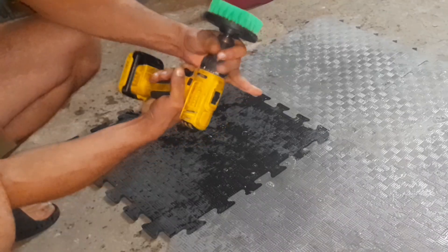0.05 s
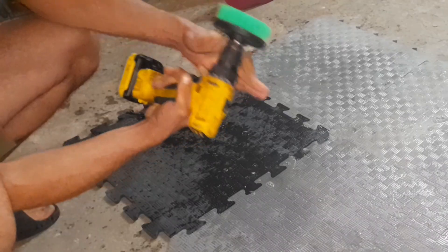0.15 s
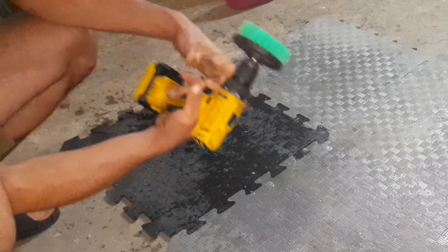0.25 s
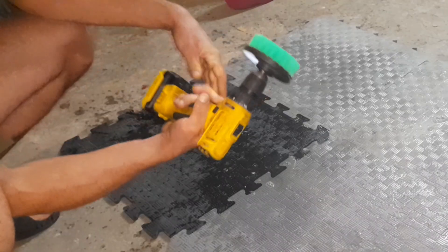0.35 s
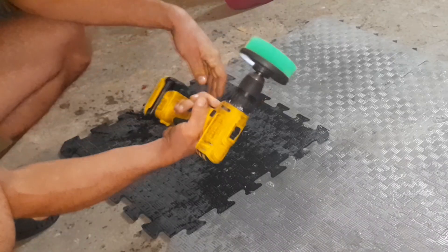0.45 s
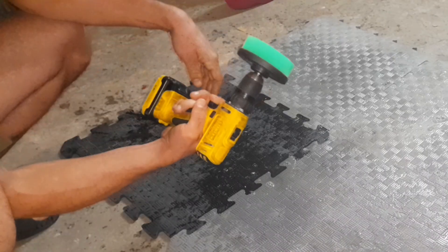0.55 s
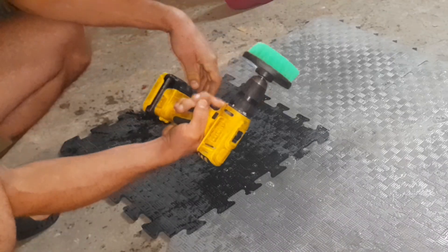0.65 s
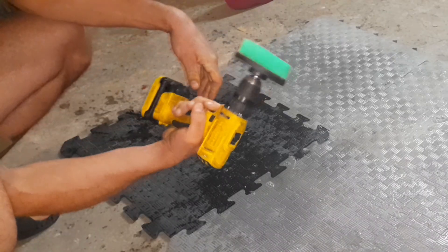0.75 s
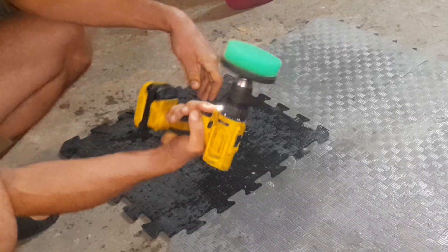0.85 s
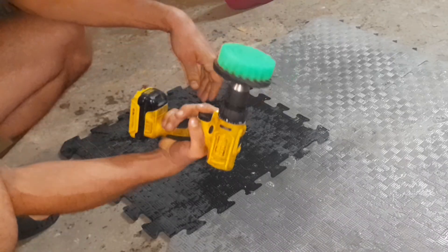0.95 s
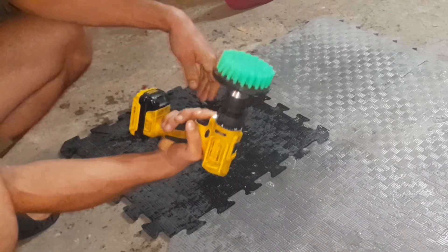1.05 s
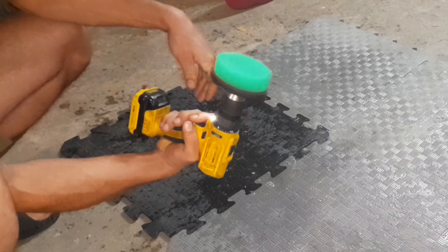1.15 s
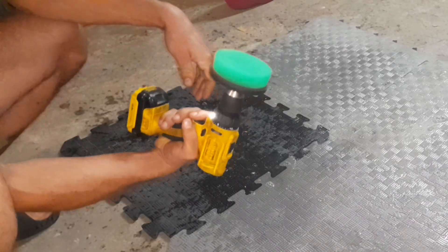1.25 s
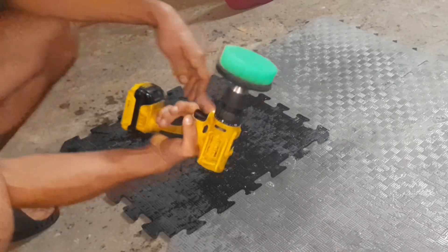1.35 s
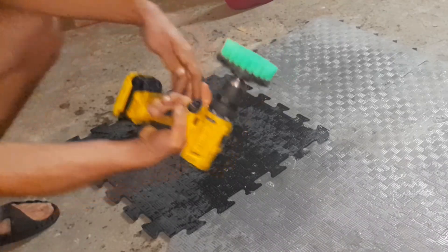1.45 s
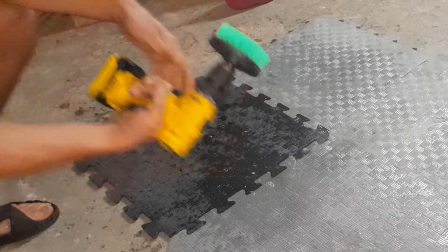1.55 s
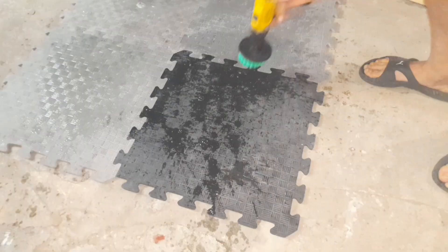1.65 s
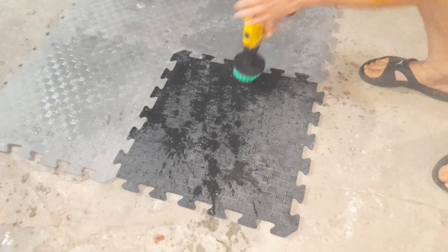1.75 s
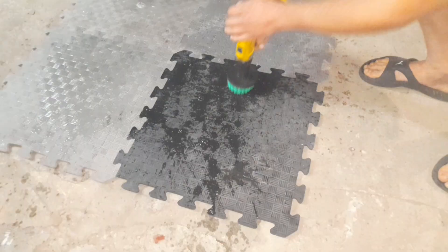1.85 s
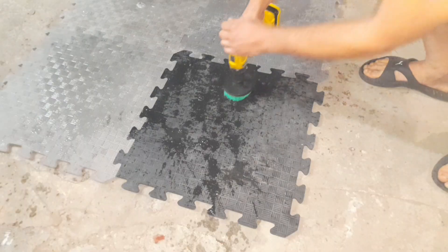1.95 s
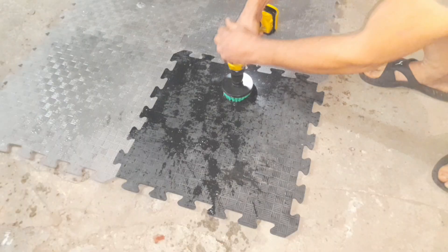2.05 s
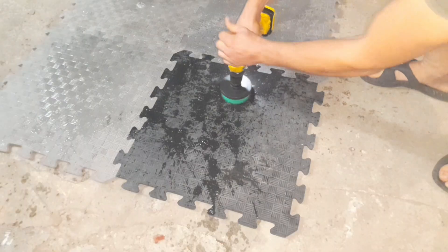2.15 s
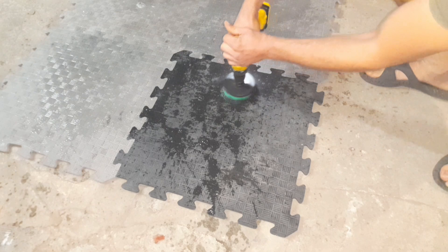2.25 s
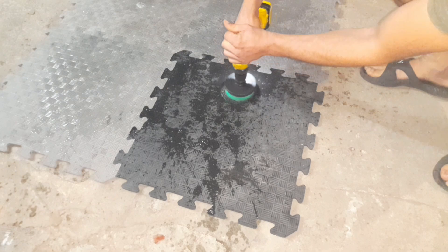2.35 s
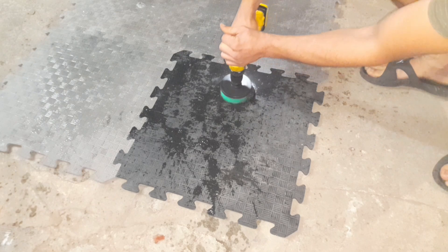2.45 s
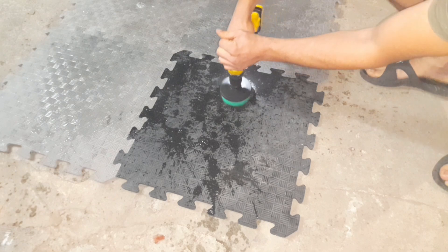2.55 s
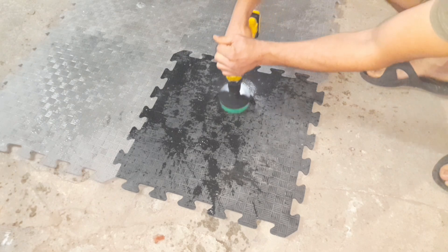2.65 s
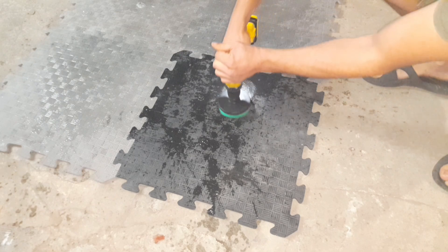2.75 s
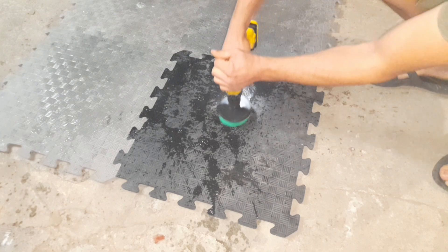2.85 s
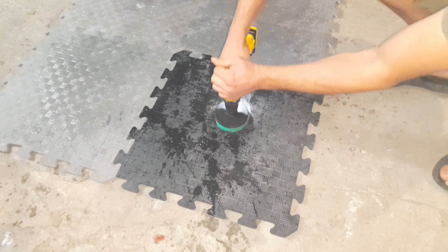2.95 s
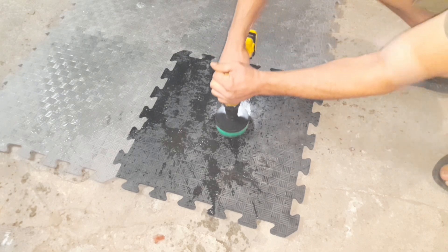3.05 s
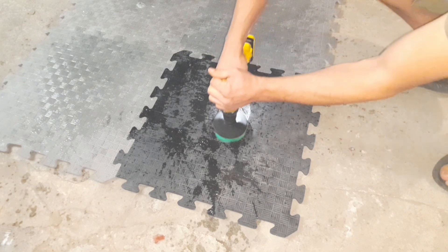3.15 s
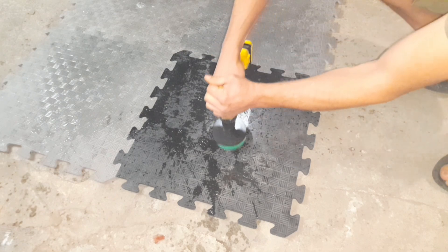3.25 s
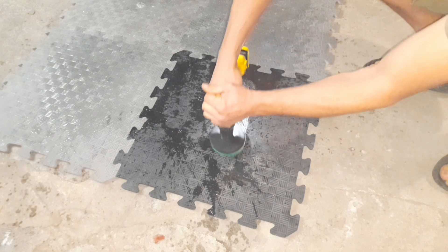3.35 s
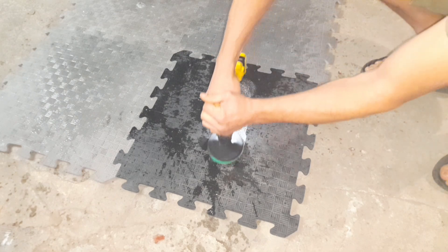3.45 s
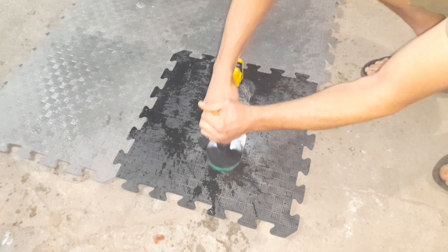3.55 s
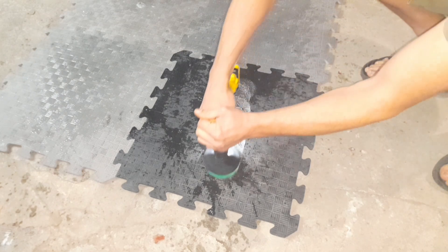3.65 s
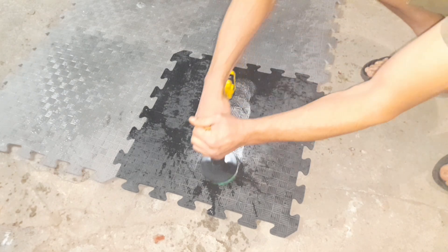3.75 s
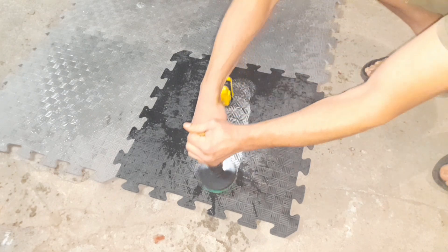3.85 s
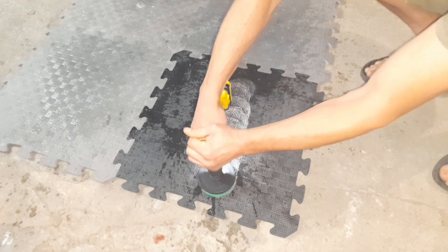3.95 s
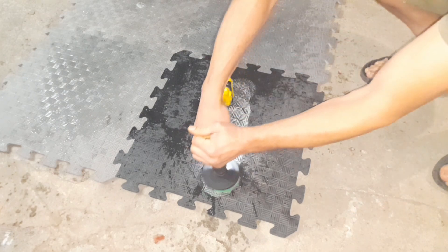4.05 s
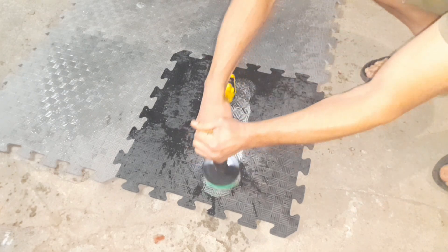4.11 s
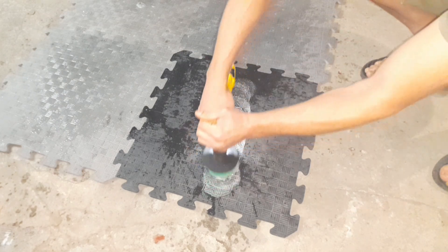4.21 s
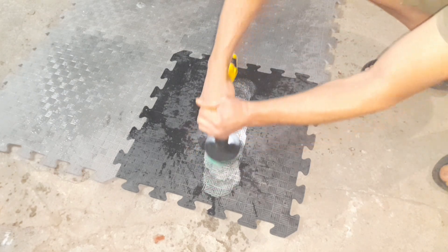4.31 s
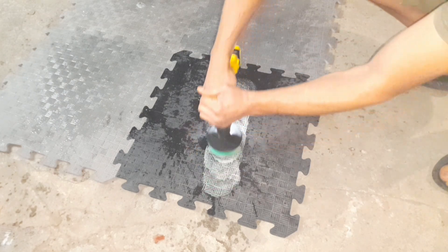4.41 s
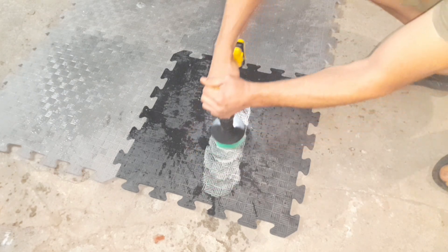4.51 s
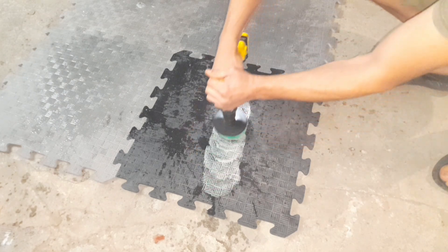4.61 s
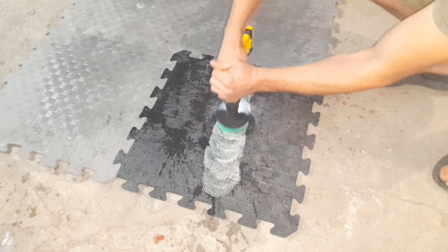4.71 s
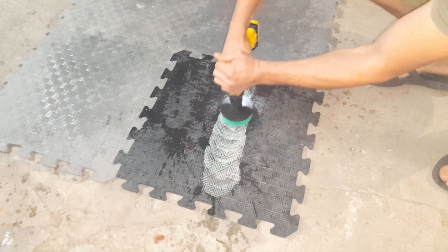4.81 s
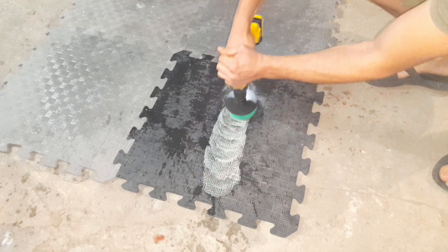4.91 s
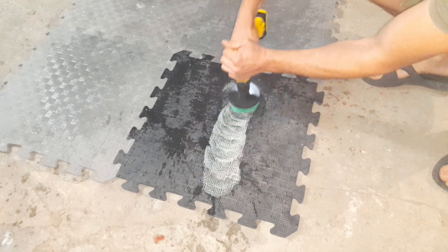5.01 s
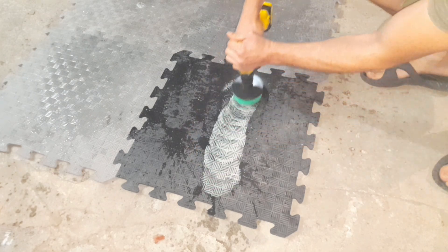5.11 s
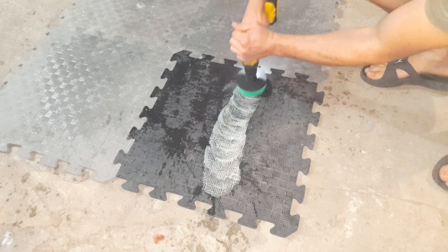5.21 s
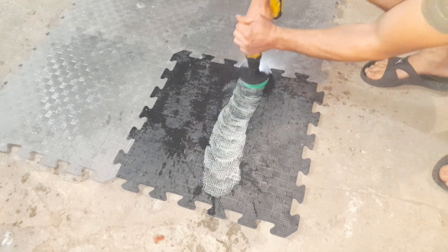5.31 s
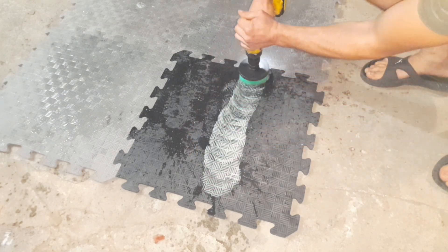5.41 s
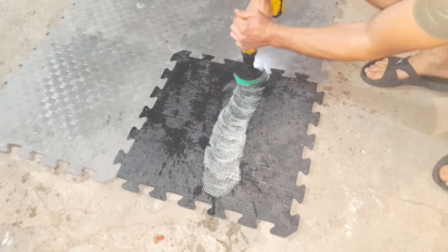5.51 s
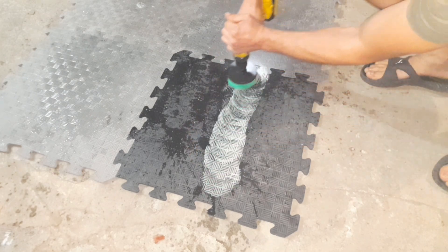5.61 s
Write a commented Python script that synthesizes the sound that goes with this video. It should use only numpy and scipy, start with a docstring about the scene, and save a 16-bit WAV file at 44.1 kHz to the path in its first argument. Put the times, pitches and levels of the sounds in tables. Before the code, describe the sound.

Three quick, grainy drill bursts with plastic and metallic clicks sound very near, while a machine hums and blows air nearby. After the air and hum cut out, only low distant rumble remains briefly. A brush touches wet rubber and starts a steady rough scrubbing, its hollow ring shifting and the loaded motor whining up and down to the end.

```python
"""Three short drill blips in the air, close to the microphone, over the hum of a fan-like machine nearby.
The hum ends abruptly; the round scrub brush settles on a wet, soapy rubber mat and is driven forward and back.
Random grains make the bristles, spray and gear rattle; sine tones that waver with speed make the motor.
Struck resonances make the clacks; filtered noise makes the machine's air and the distant outdoor rumble."""
import sys
import numpy as np
from scipy import signal
from scipy.fft import rfft, irfft
from scipy.io import wavfile

SR = 44100
rng = np.random.default_rng(int(sys.argv[2]) if len(sys.argv) > 2 else 0)


def persist_wave(psi):
    """Save psi, clipped to +-1, as 16-bit WAV."""
    counts = np.round(np.clip(psi, -1, 1) * 32767).astype(np.int16)
    wavfile.write(sys.argv[1], SR, np.atleast_2d(counts).T)


N = 250047
TIME = np.arange(N) / SR
BIN_HZ = np.maximum(np.arange(N // 2 + 1) * SR / N, 1)

# Trigger blips in the air. Each row: pressed in seconds, released in seconds, pitch the motor heads for in Hz,
# spin-up time constant in seconds, gear rattle in dB at full speed.
TRIGGER_BLIPS = [(.37, .553, 1000, .15, -38.2), (.696, .9, 860, .09, -38.3),
                 (1.108, 1.315, 860, .098, -38.9)]
# Motor and gear tones in the air. Each row: multiple of the motor pitch, level in dB at full speed.
FREE_ORDERS = [(1, -48), (2, -51), (3, -46.5), (6, -48), (14, -62)]
# Spectra of the free drill: gear rattle, air and bearing noise, low shaking.
# Each row: frequency in Hz, relative density in dB.
GEARBOX_SPECTRUM = [(250, -22.5), (500, -1), (900, -2), (1900, 3), (2600, -1.5), (3900, 2.5), (4350, 1.5),
                    (4900, 0.5), (6000, 2), (7500, -11.5), (16000, -30)]
WHIRR_SPECTRUM = [(1500, -22), (4400, 5.5), (8400, 0.5), (16000, -8.5)]
SHAKE_SPECTRUM = [(25, -30), (45, -6), (62, 7), (100, 0.5), (170, -14.5), (300, -12), (600, -41.5)]
KICK_HZ, SWITCH_S = 379, .012   # the motor starts from this pitch; time of a switching ramp
COAST_S = .066   # time constant of the run-down
FULL_SPEED_HZ, STALL_HZ = 804, 60   # reference pitch; below the second the gears fall silent
RATTLE_GROWTH = 0.38   # power of the speed
BRAKE_RATTLE_DB, BRAKE_S = 3.5, 0.047   # slack gears rattle harder just after release
EASE_S, EASE_DB = .042, -4.5   # the finger eases off just before release and unloads the gears

# Brush scrubbing the mat. Each row: time in seconds, relative bristle level in dB, relative spray level in dB.
SCRUB_EFFORT = [(2.17, -26, -41), (2.32, -24.5, -36), (2.52, -26.5, -41), (2.72, -24.5, -37),
                (2.85, -27, -39), (3.2, -26, -38), (3.83, -27.5, -40), (4.6, -26.5, -39), (5.64, -27, -37),
                (5.67, -27.5, -36)]
# Motor under load. Each row: time in seconds, motor pitch in Hz, level in dB.
LOADED_MOTOR = [(2.1, 300, -66), (2.3, 328, -56), (2.55, 320, -58), (2.8, 372, -56), (3.0, 390, -53),
                (3.22, 388, -54), (3.5, 376, -66), (3.88, 318, -55), (4.15, 281, -61), (4.5, 333, -61),
                (4.65, 316, -58), (4.83, 340, -64), (5.13, 315, -56.5), (5.4, 345, -62), (5.67, 393, -58)]
# Motor tones under load. Each row: multiple of the motor pitch, level in dB relative to the motor.
LOADED_ORDERS = [(1, 1), (1.09, -7), (2, -9), (3, -2), (4, -10)]
# Hollow under the brush. Each row: time in seconds, relative level in dB, centre in Hz.
HOLLOW_RING = [(2.17, -34, 1210), (2.4, -36, 1300), (2.53, -34, 1110), (2.82, -29, 1230), (3.06, -31, 1190),
               (3.15, -30.5, 1050), (3.29, -29, 1250), (3.4, -26.5, 1220), (3.52, -30, 1430),
               (3.75, -35, 1260), (4.26, -36, 1110), (4.51, -26.5, 1220), (4.66, -30.5, 1100),
               (5.07, -37, 1290), (5.18, -36, 1460), (5.67, -37, 1090)]
# Spectra at the mat: driven bristles, flung soap, still bristles settling, tufts snapping free.
# Each row: frequency in Hz, relative density in dB.
BRISTLE_SPECTRUM = [(150, -57), (280, -21.5), (520, -21.5), (880, -9.5), (1600, -8), (2800, -0.5),
                    (4400, -5.5), (5800, -4.5), (8400, -16.5), (12000, -31)]
SPRAY_SPECTRUM = [(6000, -28), (9500, -4.5), (13000, -1.5), (14700, 1), (16000, -11)]
TOUCH_SPECTRUM = [(300, -22), (700, -12.5), (1200, 0.5), (1900, -3.5), (2600, -4.5), (4400, -4),
                  (8000, -17), (16000, -21)]
TUFT_SPECTRUM = [(400, -23), (650, 0), (900, 7.5), (2000, -0.5), (3000, -20)]
# Brush disc and the drill behind it. Each row: resonance in Hz, width in Hz, lift in dB.
DISC_RESONANCES = [(624, 12, 6), (896, 25, 2.5), (1820, 54, 2.5), (2400, 80, 1), (2730, 44, 2.5),
                   (3040, 58, 1)]
SCRUB_START_S, SCRUB_ATTACK_S, SCRUB_RISE_DB = 2.083, 0.075, 25.5   # the brush spins up on the mat
BRISTLE_DB, SPRAY_DB, HOLLOW_DB = -0.5, 0.5, -0.2   # added to the levels in the tables
SPRAY_ONSET_S = 0.095   # the soap spray comes up over this time
SETTLE_S, SETTLE_ATTACK_S, SETTLE_HOLD_S = 1.956, .018, .052   # hold counts from the start
SETTLE_DB, SETTLE_FADE_DB_PER_S = -45.5, 240

# Chuck and spindle lock clacking, brush knocking down.
# Each row: time in seconds, relative strength in dB, brightness in dB per octave.
CLACKS = [(0.359, -21, 0.5), (0.548, -26.5, -9), (0.564, -14.8, -1), (0.58, -25, -7), (0.588, -24, -5.5),
          (0.684, -30, -1), (0.895, -29, 0), (0.911, -23.5, -2), (1.312, -26, 1), (1.33, -25, 0),
          (2.073, -40, -8), (2.102, -33, -3)]
# Drill housing modes. Each row: frequency in Hz, relative strength in dB, 60 dB decay in seconds.
HOUSING_MODES = [(1350, -19, .02), (1900, -18, .02), (2600, -16, .015), (3300, -15, .012), (4200, -15, .01),
                 (5400, -9, .012), (6300, -10, .01), (8000, -15, .008), (11300, -16, .008),
                 (13500, -16, .006)]

# Wavering tones of the nearby machine. Each row: frequency in Hz, rate of wandering in Hz, level in dB.
MACHINE_TONES = [(90.5, 5.8, -49), (965, 5.99, -54), (890, 30, -64), (1965, 31, -59)]
# Rushing air of the nearby machine. Each row: frequency in Hz, relative density in dB.
MACHINE_SPECTRUM = [(25, -32), (55, -4.5), (95, -6.5), (175, -16.5), (290, -19.5), (600, -24.5), (900, -16),
                    (1150, -29.5), (1550, -20), (2400, -22.5), (4500, -19), (6200, -23.5), (8000, -36),
                    (16000, -41)]
# The machine's air arrives from all sides. Each row: frequency in Hz, left-right likeness from 0 to 1.
DIFFUSE_LIKENESS = [(290, .9), (640, 0)]
MACHINE_DB, HUM_HZ, HUM_DB, HUM_ENDS_S = -41, 285, -50.9971, 1.612
TAIL_DB, TAIL_FADE_DB_PER_S = -8, 100   # the rush drops and fades out quickly where the hum ends

# Distant outdoor rumble. Each row: frequency in Hz, relative density in dB.
YARD_SPECTRUM = [(25, -26.5), (55, 3.5), (75, -5), (130, -5.5), (210, -15), (700, -28.5), (2800, -44),
                 (16000, -47.5)]
YARD_DB = -50

# Microphone pair on close sounds. Each row: frequency in Hz, left-right likeness from 0 to 1.
PAIR_LIKENESS = [(60, .98), (240, .92), (500, .82), (1000, .68), (2000, .5), (4000, .08), (8000, 0)]
# Balance of the pair. Each row: frequency in Hz, left minus right in dB.
PAIR_BALANCE = [(2700, -2.5), (4400, -1), (6400, -5.5), (8200, 12.5), (9800, -0.5), (12500, -7),
                (15000, -4.5)]
# Response common to the pair. Each row: frequency in Hz, gain in dB.
PAIR_RESPONSE = [(8400, 0), (9800, -4.5), (12200, 1)]
CUTOFF_HZ = 15900


def trigger():
    """Each blip kicks the motor, spins it up and lets it run down; gives pitch and rattle strength."""
    pitches, rattles = [], []
    for pressed, released, top_hz, spin_up_s, db in TRIGGER_BLIPS:
        driven_s = np.minimum(since(pressed), released - pressed)
        hz = top_hz - (top_hz - KICK_HZ) * np.exp(-driven_s / spin_up_s)
        hz = hz * ramp(pressed, SWITCH_S) * np.exp(-since(released) / COAST_S)
        braking = ramp(released, SWITCH_S) * np.exp(-since(released) / BRAKE_S)
        easing = ramp(released - EASE_S, SWITCH_S) - ramp(released, SWITCH_S)
        rattle_db = db + EASE_DB * easing + BRAKE_RATTLE_DB * braking
        pitches.append(hz)
        rattles.append(from_db(rattle_db) * (hz / FULL_SPEED_HZ) ** RATTLE_GROWTH)
    pitch_hz = np.max(pitches, axis=0)
    turning = np.clip(pitch_hz / STALL_HZ - 1, 0, 1)
    return pitch_hz, turning * np.max(rattles, axis=0)


def free_drill():
    """Gear rattle swells once a turn; whirr and whine grow steeply with speed; the brush shakes the air."""
    pitch_hz, rattling = trigger()
    speed = pitch_hz / FULL_SPEED_HZ
    mesh = 1 + 0.43 * np.cos(2 * np.pi * np.cumsum(pitch_hz) / SR)
    rattle = rattling * colour(grains(16000, spread_db=1.8) * mesh, GEARBOX_SPECTRUM)
    whirr = from_db(-40) * speed ** 1.3 * colour(hiss() * mesh, WHIRR_SPECTRUM)
    tones = speed ** 2 * whine(pitch_hz, FREE_ORDERS, jitter=.013, flutter_db=2.5)
    shake = from_db(-43.0) * speed * colour(hiss(), SHAKE_SPECTRUM)
    return rattle + whirr + tones + shake


def scrubbing():
    """Bristles stick and flick, the hollow under the brush rings, and soap is flung off as fine spray."""
    bristle_db, spray_db = in_time(SCRUB_EFFORT)
    motor_hz, motor_db = in_time(LOADED_MOTOR)
    hollow_db, hollow_hz = in_time(HOLLOW_RING)
    rise_db = SCRUB_RISE_DB * (ramp(SCRUB_START_S, SCRUB_ATTACK_S) - 1)
    attack = ramp(SCRUB_START_S, SWITCH_S) * from_db(rise_db)
    # the tilted brush, geared down 18 to 1, presses harder once a turn, and its tufts catch unevenly
    turn = 2 * np.pi * np.cumsum(motor_hz / 18) / SR
    press = from_db(0.11 * np.sin(turn) + 0.63 * drift(90))
    flicks = colour(grains(motor_hz * 45, spread_db=2.0), BRISTLE_SPECTRUM)
    bristles = from_db(bristle_db + BRISTLE_DB) * flicks
    # whole tufts snapping free ring the hollow at two pitches
    tufts = colour(grains(motor_hz * 12, spread_db=2.0), TUFT_SPECTRUM)
    low_ring = resonate(tufts, hollow_hz, width_hz=400)
    high_ring = resonate(tufts, 1.65 * hollow_hz, width_hz=430)
    hollow = from_db(hollow_db + HOLLOW_DB) * (low_ring - from_db(-8) * high_ring)
    rub = bounce(through_disc(bristles + hollow), lag_s=.0055, sway=0.0596, gain_db=-13.5)
    droplets = colour(grains(16000, spread_db=1.5), SPRAY_SPECTRUM)
    spray = ramp(SCRUB_START_S, SPRAY_ONSET_S) * from_db(spray_db + SPRAY_DB) * droplets
    motor = from_db(motor_db) * whine(motor_hz, LOADED_ORDERS, jitter=.014, flutter_db=2.5)
    rumble = from_db(-54.5) * colour(hiss(), SHAKE_SPECTRUM)
    low_tone = from_db(-64.5) * wavering(167, rate_hz=9)
    return attack * (press * (rub + spray) + motor + rumble + low_tone)


def through_disc(x):
    """The disc's resonances lift narrow bands."""
    lift_db = sum(db / (1 + (2 * (BIN_HZ - hz) / width) ** 2) for hz, width, db in DISC_RESONANCES)
    return irfft(rfft(x) * from_db(lift_db), N)


def bounce(x, lag_s, sway, gain_db):
    """A near reflection whose path changes as the arms move."""
    late = TIME - lag_s * (1 + sway * drift(.8))
    return x + from_db(gain_db) * np.array([np.interp(late, TIME, side) for side in x])


def clacks():
    """Each knock is a sharp snap that rings the housing's modes with strengths of its own."""
    at, strength_db, bright_db = np.transpose(CLACKS)
    chance_db = rng.normal(0, 1.5, (len(at), len(HOUSING_MODES)))
    starts = (at * SR).astype(int)
    rings = np.zeros(N)
    for k, (hz, db, t60) in enumerate(HOUSING_MODES):
        clicks = np.full(N, 1e-18)
        tilt_db = bright_db * np.log2(hz / 4000)
        clicks[starts] = from_db(strength_db + db + chance_db[:, k] + tilt_db)
        r, w = from_db(-60 / (t60 * SR)), 2 * np.pi * hz / SR
        rings += (-1) ** k * signal.lfilter([0, np.sin(w)], [1, -2 * r * np.cos(w), r * r], clicks)
    # the loose jaws chatter for a few milliseconds in every knock
    chatter = rng.standard_normal(300) * np.exp(-np.arange(300) / (SR * .0015))
    rings = signal.lfilter(chatter / np.linalg.norm(chatter), [1], rings)
    blows = np.full(N, 1e-18)
    blows[starts] = from_db(strength_db)
    burst = signal.lfilter([1], [1, -np.exp(-1 / (SR * 0.0025))], blows)
    snap = burst * colour(hiss(), GEARBOX_SPECTRUM)
    return from_db(4.5) * rings + from_db(-2.5) * snap + from_db(1.5) * echoes(rings, t60=0.2)


def echoes(x, t60, size=8192):
    """Diffuse reflections from the floor and walls, different in each ear."""
    age = np.arange(size) / SR
    tail = rng.standard_normal((2, size)) * from_db(-60 * age / t60) * (age > .002)
    tail = signal.lfilter([1], [1, -.5], tail)   # duller than the direct sound
    return signal.fftconvolve(x[None], tail / np.sqrt(np.sum(tail ** 2) / 2), axes=1)[:, :N]


def settling():
    """The still bristles bend against the wet mat in a brief crackle of grains."""
    fade_db = SETTLE_FADE_DB_PER_S * since(SETTLE_S + SETTLE_HOLD_S)
    level = ramp(SETTLE_S, SETTLE_ATTACK_S) * from_db(SETTLE_DB - fade_db)
    return level * colour(grains(4000, spread_db=1.0), TOUCH_SPECTRUM)


def machine():
    """Rushing air with a low hum and a few unsteady tones, all nearby."""
    air = from_db(MACHINE_DB) * colour(hiss(), MACHINE_SPECTRUM, DIFFUSE_LIKENESS)
    tones = sum(from_db(db) * wavering(hz, rate) for hz, rate, db in MACHINE_TONES)
    hum = whine(HUM_HZ, [(1, HUM_DB)], jitter=0.007, flutter_db=1.5)
    present = np.clip((HUM_ENDS_S - TIME) / 0.0066, 0, 1)
    tail = from_db(TAIL_DB - TAIL_FADE_DB_PER_S * since(HUM_ENDS_S))
    return air * np.maximum(present, tail) + (tones + hum) * present


def yard():
    """A low outdoor rumble of shaped noise with a distant, wandering drone."""
    rumble = from_db(YARD_DB) * colour(hiss(), YARD_SPECTRUM)
    drone = from_db(-59) * wavering(71, rate_hz=6.7)
    return rumble + drone


def whine(pitch_hz, orders, jitter, flutter_db):
    """Tones at multiples of a pitch, as from a slightly unsteady shaft."""
    turn = 2 * np.pi * np.cumsum(pitch_hz * (1 + jitter * drift(40))) / SR
    return np.sqrt(2) * sum(from_db(db + flutter_db * drift(14)) * np.sin(k * turn) for k, db in orders)


def wavering(hz, rate_hz):
    """A tone that wanders in strength and phase; rms about 1."""
    in_phase = drift(rate_hz) * np.cos(2 * np.pi * hz * TIME)
    return in_phase + drift(rate_hz) * np.sin(2 * np.pi * hz * TIME)


def grains(per_s, spread_db):
    """Two random click trains with mostly small and a few large clicks."""
    sizes = from_db(spread_db * np.minimum(rng.exponential(1, (2, N)), 4)) * rng.choice([-1, 1], (2, N))
    return rms_one(sizes * (rng.random((2, N)) < per_s / SR))


def hiss():
    """Two unrelated white noises."""
    return rng.standard_normal((2, N))


def drift(rate):
    """Slow chance with spread 1, moving between two random points per cycle of the rate in Hz."""
    knots = rng.standard_normal(4000)
    return rms_one(np.interp(TIME * rate * 2, np.arange(len(knots)), knots))


def resonate(x, centre_hz, width_hz, size=256):
    """A resonance whose centre moves block by block."""
    out, state, r = np.zeros_like(x), np.zeros((2, 2)), np.exp(-np.pi * width_hz / SR)
    for i in range(0, N, size):
        poles = [1, -2 * r * np.cos(2 * np.pi * centre_hz[i] / SR), r * r]
        out[:, i:i + size], state = signal.lfilter([1, 0, -1], poles, x[:, i:i + size], zi=state)
    return rms_one(out)


def colour(pair, spectrum, likeness=PAIR_LIKENESS):
    """Give two unrelated signals a spectrum and blend them into left and right; mid rms 1."""
    alike = np.clip(per_bin(likeness), 0, .99)
    mid, side = rfft(pair) * from_db(per_bin(spectrum)) * np.sqrt([1 + alike, 1 - alike])
    mid, side = irfft(np.array([mid, side]), N)
    return (mid + side * np.array([[1], [-1]])) / np.std(mid)


def per_bin(points):
    """A table over log frequency at every bin."""
    hz, value = np.transpose(points)
    return np.interp(np.log(BIN_HZ), np.log(hz), value)


def in_time(rows):
    """Each column of a curve at every sample."""
    s, *columns = np.transpose(rows)
    return [np.interp(TIME, s, c) for c in columns]


def ramp(start_s, length_s):
    """Rise from zero to one and stay there."""
    return np.clip((TIME - start_s) / length_s, 0, 1)


def since(start_s):
    """Seconds gone by, zero before the start."""
    return np.maximum(TIME - start_s, 0)


def from_db(db):
    """Decibels to gain."""
    return 10 ** (np.asarray(db) / 20)


def rms_one(x):
    """Scale to rms 1."""
    return x / np.sqrt(np.mean(x ** 2) + 1e-20)


def place(x):
    """The two microphone ports share a treble dip and hear each frequency at different strength."""
    half_balance_db = per_bin(PAIR_BALANCE) * np.array([[.5], [-.5]])
    return irfft(rfft(x) * from_db(per_bin(PAIR_RESPONSE) + half_balance_db), N)


def scene():
    """The drill close by in the air, then on the mat, with the machine nearby and the yard far off."""
    close = free_drill() + scrubbing() + clacks() + settling()
    return place(close + machine() + yard())


def record(dry):
    """A steep elliptic low-pass cuts the top."""
    return signal.sosfilt(signal.ellip(12, .1, 85, CUTOFF_HZ, fs=SR, output="sos"), dry)


dry = scene()
out = record(dry)
persist_wave(out)
```